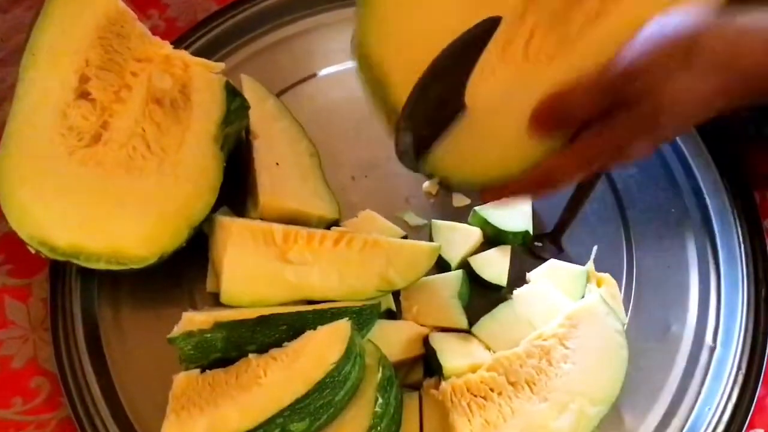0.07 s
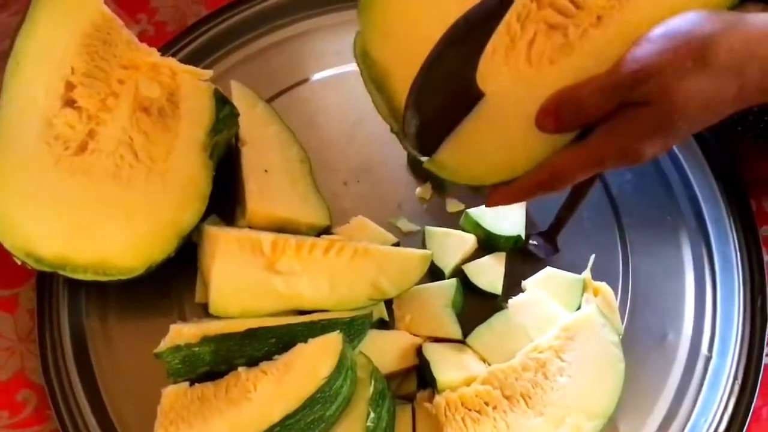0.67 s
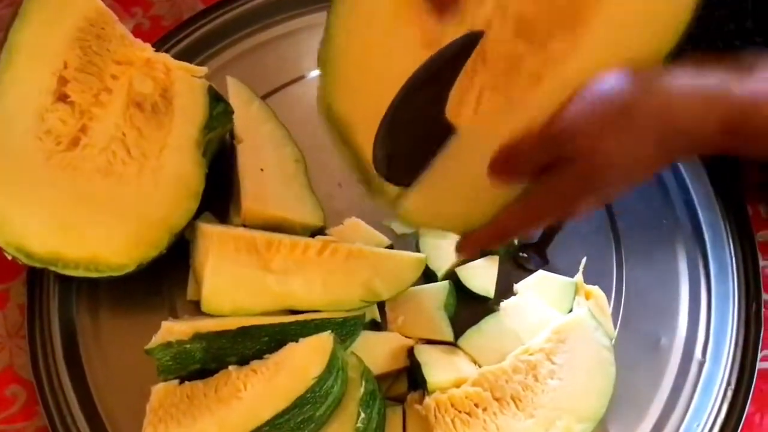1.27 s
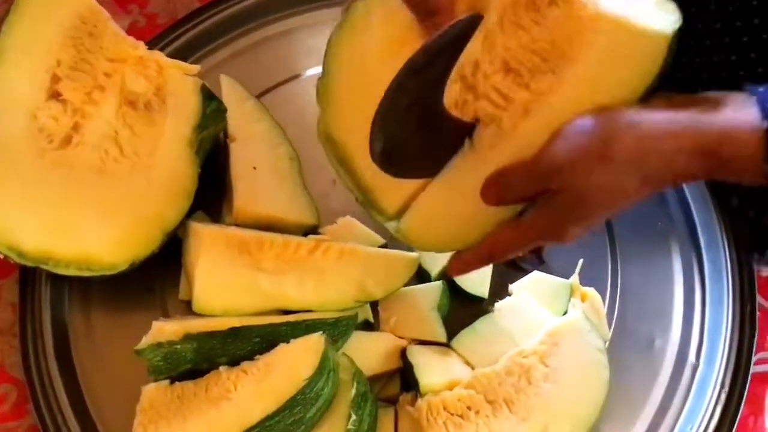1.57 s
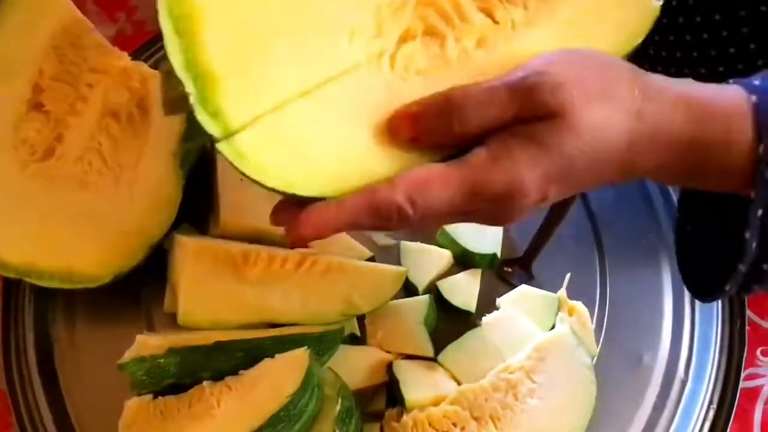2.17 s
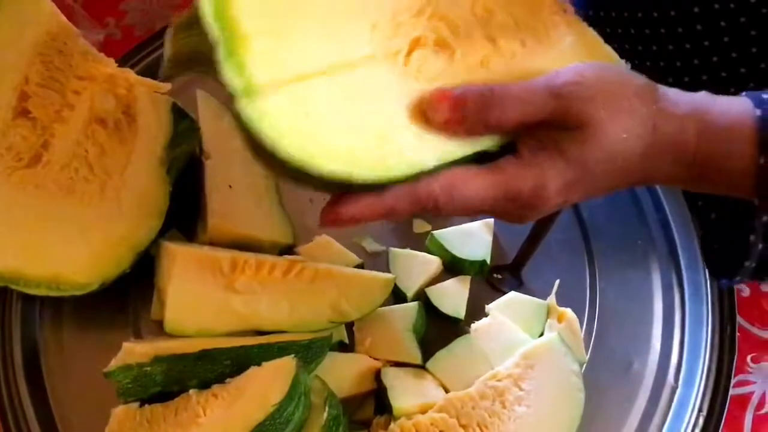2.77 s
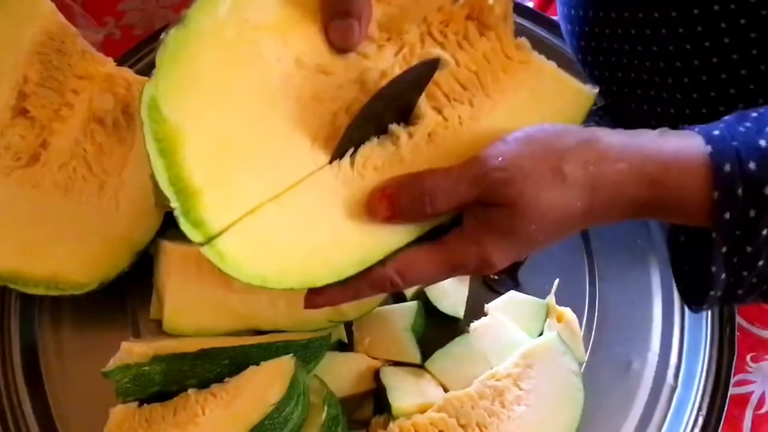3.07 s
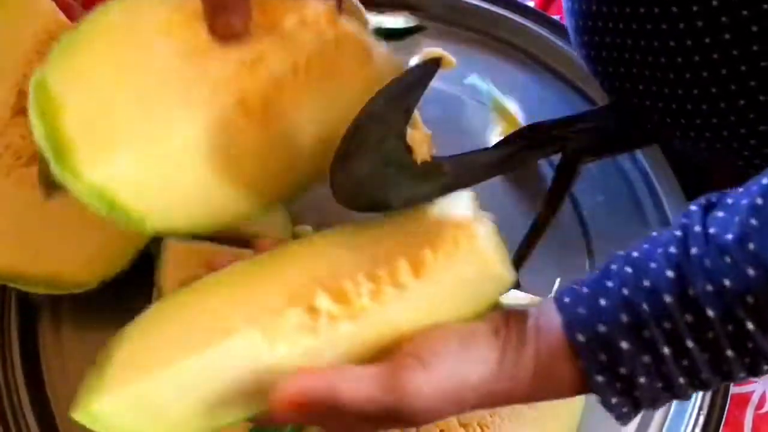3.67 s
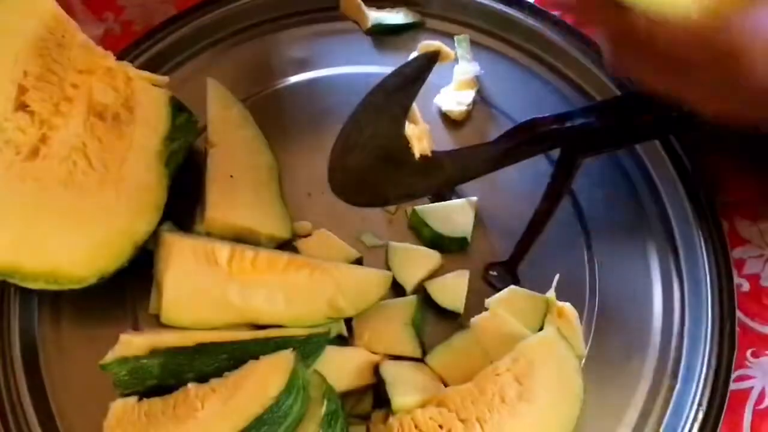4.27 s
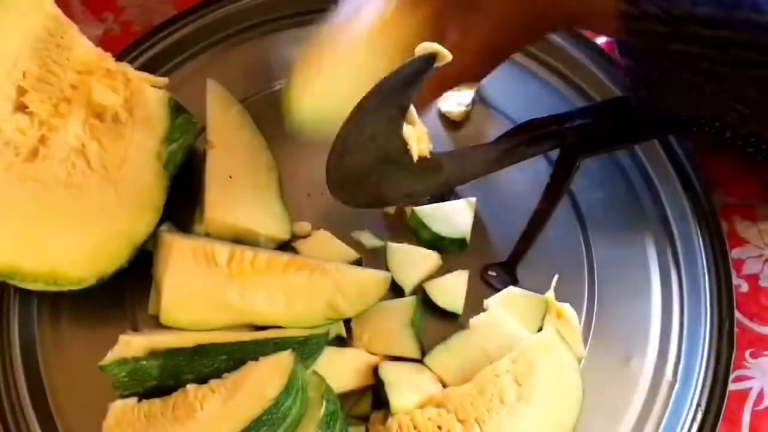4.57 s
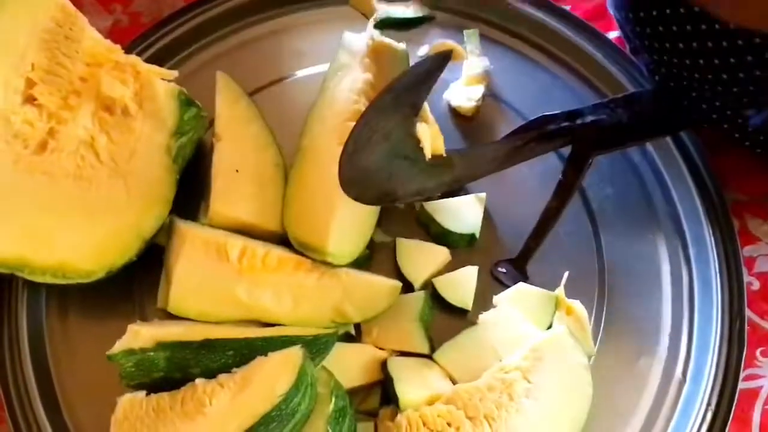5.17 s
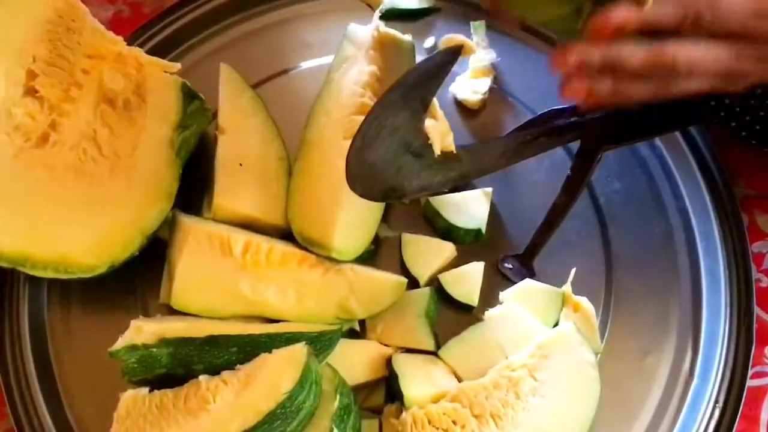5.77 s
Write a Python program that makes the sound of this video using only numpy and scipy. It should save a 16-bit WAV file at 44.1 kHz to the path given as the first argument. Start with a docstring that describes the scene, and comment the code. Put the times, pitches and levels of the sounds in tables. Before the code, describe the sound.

A blade crunches softly through raw pumpkin, then pieces knock on a steel tray over a faint fan hum.

```python
"""A small kitchen with a humming fan, one microphone close to a steel tray.
A raw pumpkin is pushed onto a curved blade that stands in the tray. The wet flesh squeezes
along the steel, tears in short crunches as cells and fibres break, snaps and splits off.
A sleeve rustles, the pieces bump the tray, and a wedge is dropped on it and rocks to rest.
Behind it all are the fan, a short echo off the walls and a low drone that swells at the end."""
import sys
import numpy as np
from scipy import signal
from scipy.fft import rfft, irfft, next_fast_len
from scipy.io import wavfile
from scipy.ndimage import uniform_filter1d

SR = 44100
rng = np.random.default_rng(int(sys.argv[2]) if len(sys.argv) > 2 else 0)


def store_wav(level_fs):
    """Save 16-bit WAV to argv[1]."""
    pcm = np.round(np.clip(np.atleast_2d(level_fs), -1, 1) * 32767)
    wavfile.write(sys.argv[1], SR, pcm.T.astype(np.int16))


N = 265834
TIME = np.arange(N) / SR

# the blade jerks through the flesh, close up: (centre t/s, half length/s, relative level/dB)
PUSHES = [(0.055, 0.022, -64.5), (0.096, 0.024, -62.5), (1.285, 0.018, -56.5), (1.318, 0.0066, -47.5),
          (1.358, 0.032, -63), (1.376, 0.0028, -51.5), (2.048, 0.0088, -55.5), (2.067, 0.0033, -51.5),
          (3.267, 0.014, -47), (3.284, 0.012, -41.5), (3.338, 0.01, -44.5)]
# the flesh cracks ahead of the blade: (centre t/s, half length/s, relative level/dB, f/Hz)
CRACKS = [(1.309, 0.0036, -47, 2960), (1.324, 0.0051, -44, 2550), (2.053, 0.008, -50.5, 2080),
          (3.257, 0.0021, -38.5, 2180), (3.264, 0.0086, -33, 1530)]
# spectra of breaking fibres, bursting cells and the shaking blade: (f/Hz, relative level/dB)
FIBRE_SPECTRUM = [(200, 3), (330, 4.5), (560, -3.5), (800, -0.5), (1100, 0.5), (1450, 0), (2000, 5),
                  (2900, -1.5), (3900, -5.5), (6000, -13.5), (15000, -38)]
CELL_SPECTRUM = [(700, -11), (1800, -7), (2800, -1), (4200, -3.5), (5400, -1), (7600, -6), (8600, 5),
                 (10000, -3.5), (12500, -6.5), (15500, -12)]
SHUDDER_SPECTRUM = [(25, -30), (50, -15), (75, -3), (115, -7), (180, -22), (290, -16.5), (600, -30.5),
                    (1200, -32), (4000, -73)]
def tearing():
    """Each push bursts cells, breaks fibres and shakes the blade; a crack is a louder fibre volley."""
    breaks = ruptures(per_s=4900, spread_db=5.5)
    bursts = ruptures(per_s=8000, spread_db=0.5)
    fibres = cell_power = shudder_power = 0
    for s, half, db in PUSHES:
        cell_power += (from_db(db) * swell(s, half)) ** 2
        # the shudder outlasts the push and varies less in level
        shudder_power += (from_db(-26 + 0.52 * db) * swell(s, 2.24 * half)) ** 2
    push_crunches = [(s, half, db - 10.5, 2650) for s, half, db in PUSHES]
    for s, half, db, hz in CRACKS + push_crunches:
        volley = from_db(db) * swell(s, half) * breaks + 1e-18
        gap_ring = band(volley, hz / 1.084, hz * 1.03, order=1)
        fibres += 0.45 * volley + 0.66 * gap_ring
    fibres = colour(fibres, FIBRE_SPECTRUM)
    cells = colour(np.sqrt(cell_power) * bursts, CELL_SPECTRUM)
    shudder = colour(np.sqrt(shudder_power) * noise(), SHUDDER_SPECTRUM)
    # the blade passes the crunch on to the tray's high modes
    ringing = through(fibres, band(tray_ring(), 953, 3050, order=5))
    return from_db(2) * fibres + cells + from_db(-17.5) * ringing + shudder


# the rind snaps, crumbs tick, and the dropped wedge slaps and spatters:
# (t/s, peak level/dB, f/Hz, decay time/s)
SNAPS_AND_SPATTER = [(0.359, -59.5, 9000, 0.0012), (1.141, -47.5, 2880, 0.0066),
                     (2.8949, -27.5, 2650, 0.0018), (2.9286, -34.5, 2600, 0.001), (3.052, -56, 9500, 0.002),
                     (3.534, -47, 1116, 0.018), (3.56, -52.5, 2830, 0.013), (3.653, -49.5, 1510, 0.0075),
                     (3.694, -55, 3100, 0.0093), (4.789, -46.5, 1490, 0.0047), (4.791, -56, 8800, 0.011),
                     (5.527, -63, 9500, 0.0015)]
def snaps_and_spatter():
    """Each snap, tick, slap or spatter is a single sharp burst."""
    out = np.zeros(N)
    for s, db, hz, decay_s in SNAPS_AND_SPATTER:
        add(out, s, from_db(db) * sharp_burst(hz, decay_s))
    return out


def sharp_burst(hz, decay_s):
    """One click, then dying noise that rings at its pitch; low ones are also dull."""
    t = TIME[:SR // 10]
    burst = (t == 0) + 0.33 * rng.standard_normal(len(t)) * np.exp(-t / decay_s)
    crack = band(burst, hz / 1.49, hz * 1.35) + 0.5 * burst
    return peak_one(band(crack, hz / 6, hz * 2.28))


# pumpkin meets tray, near the microphone; levels are relative:
# (t/s, thud level/dB, clack level/dB, contact f/Hz, first rebound against the blow/dB)
KNOCKS = [(0.146, -50.5, -62, 200, -15), (0.2093, -41.5, -33, 269, -6.5), (1.140, -56, -43, 600, -12),
          (1.420, -54.5, -54.5, 404, 3.5), (2.072, -49, -48, 360, -4.5), (2.127, -51, -63, 350, -10),
          (2.897, -51, -44, 685, -14), (2.929, -51.5, -45, 660, -7), (2.984, -48.5, -47.5, 350, -6),
          (3.3653, -30.5, -27, 517, -11.5), (3.410, -43, -41.5, 480, 5), (3.536, -56.5, -45, 676, -0.5),
          (3.669, -50, -40.5, 347, -9), (4.7931, -21, -24.5, 348, -11), (4.798, -30, -24.5, 339, -11),
          (4.843, -39, -42, 470, 0.5), (4.884, -45, -39, 580, -0.5), (4.913, -40, -37, 240, -4.5),
          (4.957, -39, -38, 517, -13), (5.016, -48, -45, 347, -17)]
def knocking():
    """A piece's weight thuds in the tray's low modes, its rind clacks higher ones, its flesh slaps."""
    out, ring = np.zeros(N), tray_ring()
    low_modes = band(ring, 69, 212, order=1)
    thud = peak_one(band(low_modes, 44, 380, order=1))
    for s, thud_db, clack_db, hz, rebound_db in KNOCKS:
        clack = peak_one(band(ring, hz / 1.53, hz * 1.51))
        edge = (s - 0.005, -12, 0)  # an edge of rind touches before the weight arrives
        blows = [(at, db, from_db(thud_db)) for at, db in contacts(s, rebound_db, count=3)]
        for at, db, weight in [edge] + blows:
            slap = from_db(-16.5) * sharp_burst(2.3 * hz, decay_s=0.0034)
            rind = from_db(clack_db) * (clack + np.pad(slap, (0, len(clack) - len(slap))))
            add(out, at, from_db(db) * (weight * thud + rind))
    return out


def contacts(s, rebound_db, count, first_gap_s=0.019, shrink=0.75, loss_db=3.5):
    """A blow and its ever quicker rebounds, each weaker than the one before; the first may be louder than the
    blow: (t/s, relative level/dB)."""
    k = np.arange(count)
    gaps = first_gap_s * shrink ** k * (1 + 0.06 * rng.standard_normal(count))
    return [(s, 0), *zip(s + np.cumsum(gaps), rebound_db - loss_db * k)]


# modes of the loaded steel tray: (f/Hz, relative level/dB, t60/s)
TRAY_MODES = [(74.4, -41, 0.039), (113, 1, 0.14), (137.6, 2, 0.092), (174.3, 0.5, 0.12), (240, -7, 0.26),
              (275.5, 10, 0.029), (330, 1, 0.042), (387, -5.5, 0.021), (441, -14.5, 0.17),
              (515, -4.5, 0.053), (623.7, -1.5, 0.052), (764, -1, 0.013), (1010, -12.5, 0.054),
              (1358, -12, 0.077), (1502, -13, 0.028), (1550, -69, 0.066), (1790, -8, 0.023),
              (2280, -68, .14), (2600, -62, 0.11), (3270, -74, .06)]
def tray_ring():
    """One sharp tap leaves each mode of the tray ringing as a dying sine."""
    t = TIME[:SR // 2]
    return sum(from_db(db - 60 * t / t60) * np.sin(2 * np.pi * hz * t) for hz, db, t60 in TRAY_MODES)


# wet flesh and fingers slide and squeak, and a sleeve rustles (the two lowest strokes):
# (centre t/s, half length/s, relative level/dB, f/Hz, bandwidth/octaves)
RUBS = [(0.827, 0.029, -80.5, 6500, 1.5), (1.035, 0.015, -64, 5100, 1.8), (1.092, 0.091, -71.5, 3870, 1.74),
        (1.984, 0.091, -77, 7600, 1.4), (2.822, 0.017, -71.5, 6940, 2.2), (2.91, 0.055, -72, 6740, 1.3),
        (3.172, 0.082, -72, 1530, 1.5), (3.918, 0.034, -74.5, 8570, 0.16), (3.948, 0.075, -70, 1190, 1.44),
        (4.443, 0.032, -76, 4980, 2.1), (5.858, 0.015, -76.5, 5500, 1)]
def rubbing():
    """Fine friction of flesh, fingers or cloth, with a pitch of its own in each stroke."""
    grain, out = ruptures(per_s=9000, spread_db=3.0), np.zeros(N)
    for s, half, db, hz, octaves in RUBS:
        edge_ratio = 2 ** (octaves / 2)
        friction = rms_one(band(grain, hz / edge_ratio, hz * edge_ratio))
        out += from_db(db) * swell(s, half) * friction
    return out


# room tone, the fan's rush and hiss: (f/Hz, relative level/dB)
RUSH_SPECTRUM = [(18, -50), (30, -29), (48, -5), (122, -1.5), (145, -4), (252, -4.5), (286, -2.5),
                 (420, -3), (521, -9.5), (572, -7.5), (608, -10), (668, -6), (1200, -17.5), (1560, -42),
                 (2640, -120)]
HISS_SPECTRUM = [(500, -13), (900, -25), (1300, 4.5), (2600, -0.5), (3600, -5.5), (4800, -5.5),
                 (5800, -12.5), (7700, -16.5), (8600, -8.5), (10500, -17.5), (13500, -22.5), (15500, -40)]
# the fan's hum: (f/Hz, level/dB)
HUM_LINES = [(59.2, -72), (118.4, -75.5), (285.3, -72), (376.8, -76), (565.2, -73.5), (651.4, -97)]
# a low drone swells at the end: (t/s, level/dB)
DRONE_SWELL = [(0, -79), (5.2, -71), (5.45, -68), (5.75, -67), (6.03, -59.5)]
def fan(drone_hz=92.8):
    """A steady rush of air in the background, with wavering hum lines and a late drone."""
    rush = from_db(-62.5) * colour(noise(), RUSH_SPECTRUM)
    hiss = from_db(-73) * colour(noise(), HISS_SPECTRUM)
    drone_db = np.interp(TIME, *np.transpose(DRONE_SWELL))
    hum = 0
    for hz, db in HUM_LINES + [(drone_hz, drone_db)]:
        amplitude = np.sqrt(2) * from_db(db + drift(4.8))
        hum += amplitude * np.sin(2 * np.pi * hz * TIME + 0.69 * drift(3.1))
    return rush + hiss + hum


# the kitchen's echo: (f/Hz, t60/s)
ECHO_DECAY = [(100, 0.4), (500, 0.48), (2000, 0.43), (6000, 0.47), (14000, 0.3)]
def kitchen(x, build_up_s):
    """Dense echoes off the near walls build up quickly and die fastest in the high treble."""
    t, edges = TIME[:SR * 2 // 3], np.geomspace(40, 18000, 10)
    echo = 0
    for low, high in zip(edges, edges[1:]):
        fade = from_db(-60 * t / at_hz(ECHO_DECAY, np.sqrt(low * high)))
        echo += band(rng.standard_normal(len(t)), low, high) * fade
    onset = 1 - np.exp(-(t / build_up_s) ** 2)
    return through(x, echo * onset)


def ruptures(per_s, spread_db):
    """Tiny breaks of uneven size at random moments; the steady push evens out their power."""
    sizes = from_db(spread_db * np.minimum(rng.exponential(1, N), 4)) * rng.choice([-1, 1], N)
    clicks = sizes * (rng.random(N) < per_s / SR)
    local_power = uniform_filter1d(clicks ** 2, size=500)
    return clicks / np.sqrt(np.maximum(local_power, 1e-3))


def from_db(db):
    return 10 ** (np.asarray(db) / 20)


def rms_one(x):
    return x / np.sqrt(np.mean(x ** 2) + 1e-20)


def peak_one(x):
    return x / np.max(np.abs(x))


def at_hz(points, hz):
    """Reads a table on a log-frequency axis."""
    f, value = np.transpose(points)
    return np.interp(np.log(np.maximum(hz, 1)), np.log(f), value)


def band(x, low_hz, high_hz, order=2):
    """Causal band-pass."""
    edges = [min(low_hz, .4 * SR), min(high_hz, .45 * SR)]
    return signal.sosfilt(signal.butter(order, edges, "band", fs=SR, output="sos"), x)


def colour(x, spectrum):
    """Shapes x by a spectrum that falls away past its ends; white input keeps its power."""
    size = next_fast_len(N)
    hz = np.fft.rfftfreq(size, 1 / SR)
    skirts = np.minimum(hz / spectrum[0][0], 1) * np.minimum(spectrum[-1][0] / (hz + 1), 1)
    gain = rms_one(from_db(at_hz(spectrum, hz)) * skirts ** 2)
    return irfft(rfft(x, size) * gain, size)[:N]


def noise():
    return rng.standard_normal(N)


def drift(rate_hz):
    """A slow random wander with spread about 1."""
    return np.interp(TIME * rate_hz, np.arange(N), noise())


def swell(centre, half_length):
    """A bell-shaped rise and fall."""
    return np.exp(-.5 * ((TIME - centre) / half_length) ** 2)


def add(track, s, sound):
    """Mixes a short sound in at time s."""
    i = max(round(s * SR), 0)
    track[i:i + len(sound)] += sound[:N - i]


def through(x, response):
    """Convolves x with a response scaled to unit energy."""
    return signal.fftconvolve(x, response / np.linalg.norm(response))[:N]


def scene():
    """Pumpkin and tray up close, walls and fan behind them, in mono."""
    cutting = tearing() + rubbing()
    clicks = snaps_and_spatter()
    knocks = from_db(0.5) * knocking()
    direct = from_db(1) * cutting + clicks + knocks
    to_walls = from_db(-8) * cutting + from_db(-11.5) * clicks + from_db(-12) * knocks
    return (direct + kitchen(to_walls, build_up_s=0.00091) + fan())[None]


def record(dry):
    """The microphone drops the deepest bass; the top is cut steeply."""
    low_cut = signal.butter(5, 42, "high", fs=SR, output="sos")
    high_cut = signal.ellip(10, .1, 70, 15550, fs=SR, output="sos")
    return signal.sosfilt(high_cut, signal.sosfilt(low_cut, dry))


dry = scene()
out = record(dry)
store_wav(out)
```